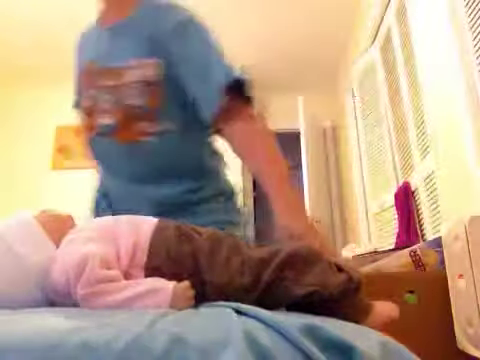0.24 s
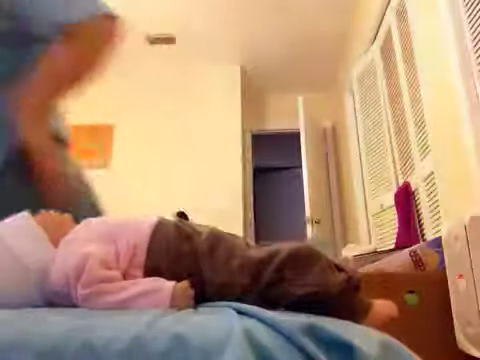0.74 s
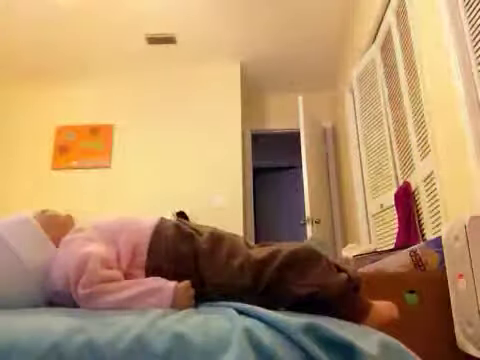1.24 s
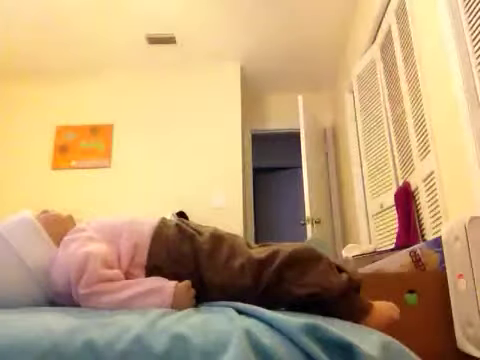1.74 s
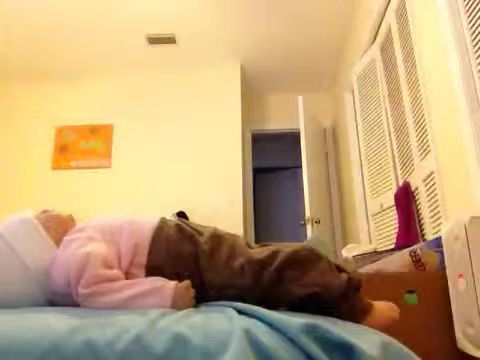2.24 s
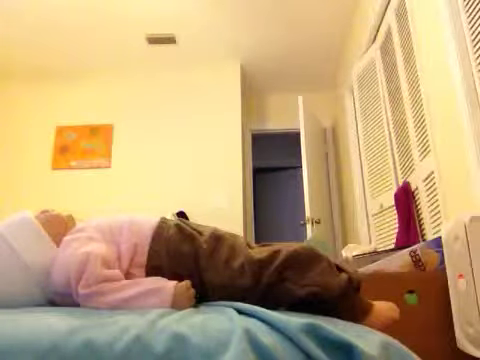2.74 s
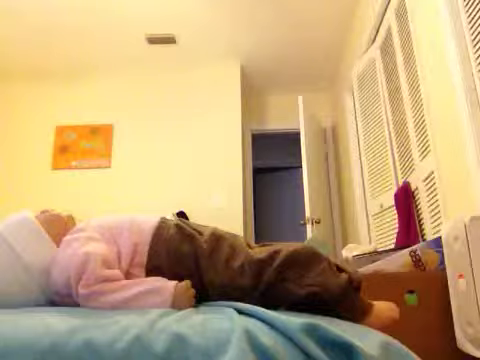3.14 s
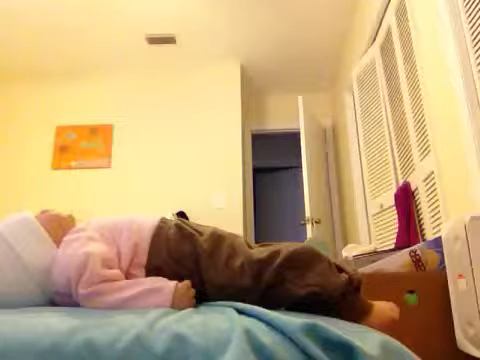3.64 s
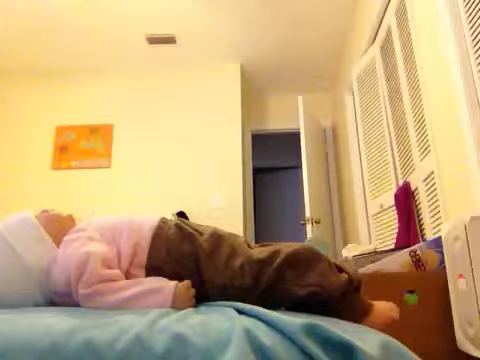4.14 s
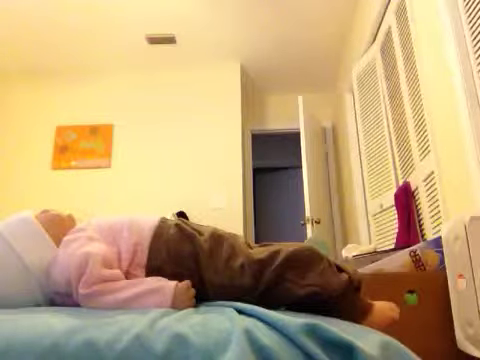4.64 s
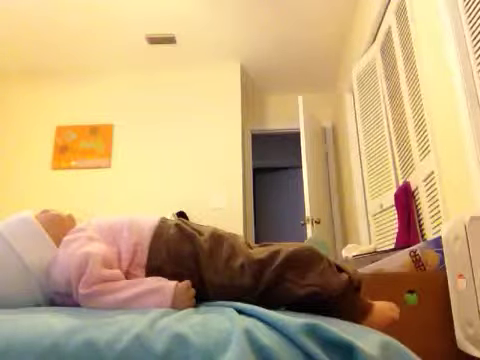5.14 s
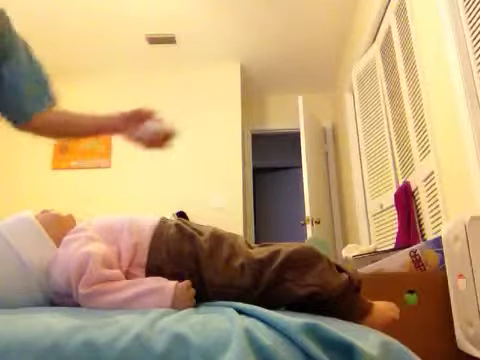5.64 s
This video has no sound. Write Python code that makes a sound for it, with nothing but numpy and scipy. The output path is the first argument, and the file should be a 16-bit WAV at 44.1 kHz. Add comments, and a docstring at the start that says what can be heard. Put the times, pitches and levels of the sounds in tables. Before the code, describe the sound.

Fixed room microphone, low steady hiss. Clothes swish and muffled footsteps thump on the floor, then a hard triple knock and a second pair break out, with short low scuffs between them. Softer thuds and rustling continue, a small cluster of knocks comes, then a dragging groan of the sole and the heaviest knock of all. The ending is nearly still, with faint cloth movement.

```python
"""Someone moves about a small, quiet bedroom, over faint steady room tone and hiss (coloured noise).
First, grainy cloth swishes (banded noise), sole rumble (low noise), soft booming footfalls and small clicks.
Then hard knocks in quick runs (thud, reflections, floor modes) and dragging soles (narrow-band noise).
Quieter steps and swishes follow; late drags lead to the loudest run of knocks, then only soft swishes."""
import sys
import numpy as np
from scipy import signal
from scipy.fft import rfft, irfft
from scipy.io import wavfile
from scipy.ndimage import uniform_filter1d

SR = 44100
rng = np.random.default_rng(int(sys.argv[2]) if len(sys.argv) > 2 else 0)


def pcm_store(signal):
    """Save signal as 16-bit PCM."""
    levels = np.round(np.clip(np.atleast_2d(signal), -1, 1) * 32767)
    wavfile.write(sys.argv[1], SR, levels.astype(np.int16).T)


N = 259730
RING_S = np.arange(SR // 2) / SR   # time since a contact

# steady room tone and hiss: freq_hz, density_db [relative, per Hz]
ROOM_TONE_SPECTRUM = [(20, -49), (50, -30), (85, -14.5), (115, 1.5), (145, -2), (250, -6.5), (480, -11),
                      (800, -13.5), (1300, -18.5), (3200, -18.5), (15000, -21.5)]
ROOM_TONE_DB = -66

# body movements: peak_s, rise_s, fall_s, swish_db, brightness_db, floor_rumble_db
MOVES = [(.23, 0.037, 0.028, -70, -10.5, -64), (.37, 0.095, 0.11, -62.5, 6, -62.5),
         (.57, 0.062, 0.25, -65, 10, -66.5), (.82, 0.13, 0.1, -64.5, 4.5, -61.5),
         (1.28, 0.11, .10, -61, 8.5, -63.5), (1.53, 0.15, 0.18, -68.5, 12, -59.5),
         (1.81, 0.022, 0.072, -57.5, -6, -59.5), (1.86, 0.075, 0.11, -56.5, 2.5, -55.5),
         (2.16, 0.047, 0.063, -49, -4, -44.5), (2.30, 0.24, 0.17, -57.5, 2, -60.5),
         (2.57, 0.088, 0.19, -57, -2, -62), (2.76, .06, 0.5, -76.5, -7, -58.5),
         (3.09, 0.08, 0.038, -75, 37, -84), (3.40, 0.19, 0.077, -87, -34, -66),
         (3.629, 0.073, 0.055, -65.5, 4, -70), (3.76, 0.1, 0.13, -62, 3, -59),
         (3.90, 0.13, 0.18, -57, 7, -53), (4.40, 0.089, 0.054, -49.5, 1.5, -49.5),
         (4.47, 0.08, 0.045, -55, -1, -48.5), (4.59, 0.042, 0.096, -50.5, 0.5, -46.5),
         (4.85, 0.06, 0.073, -67, 7, -69.5), (5.53, 0.14, 0.14, -62, 7, -67.5),
         (5.70, 0.056, 0.11, -64, 5, -66), (5.87, 0.055, 0.051, -65.5, 11, -71)]
# rubbing cloth: freq_hz, density_db [relative, per Hz]
CLOTH_SPECTRUM = [(250, -26), (450, -8.5), (650, -12), (850, -14), (1020, -12.5), (1300, -16.5),
                  (2100, -19.5), (3300, -23.5), (4300, -24.5), (5100, -24), (6000, -27.5), (8000, -35.5),
                  (15000, -37.5)]
# dragging sole and floor: freq_hz, density_db [relative, per Hz]
SOLE_SPECTRUM = [(53, -75), (90, -47), (142, -8.5), (257, -5.5), (286, -6), (382, -10), (450, -4),
                 (515, -19.5), (642, -32), (764, -16), (900, -26), (1170, -47.5), (1980, -120)]
SWELL_SHAPE = 1.64         # exponent: 1 = pointed, 2 = bell
RUMBLE_LAG_S = 0.01        # the floor answers after the clothes
SWISH_FLOOR_DB = -90.5     # tiny constant swish level, keeps the brightness division defined

# sole drags that make the floor drone: peak_s, half_length_s, level_db, pitch_hz
DRAGS = [(1.735, 0.034, -53, 288), (1.922, 0.036, -47, 271), (2.095, 0.013, -47.5, 203),
         (3.985, 0.016, -51, 280), (4.399, 0.018, -38.5, 432), (4.427, 0.04, -37.5, 298),
         (4.49, 0.051, -49, 418)]
# small clicks and creaks: start_s, level_db, centre_hz, upper_edge_over_centre [ratio], build_up_s
CLICKS = [(.505, -68.5, 7600, 1.9, 0.0026), (0.982, -56, 10900, 1.35, .003), (1.445, -55, 2300, 2.4, .0003),
          (1.456, -57, 3580, 2.8, 0.00044), (1.688, -57, 3240, 2.14, 0.00021),
          (1.7, -62.5, 6400, 2.4, 0.00017), (3.268, -61, 1840, 1.74, 0.0064)]

# colour of a blow in the reflections: freq_hz, density_db [relative, per Hz]
BLOW_SPECTRUM = [(50, -52), (90, -28.5), (130, -24), (180, 3.5), (300, 0), (480, -9), (800, -6.5),
                 (1800, -19.5), (2800, -26.5), (5000, -25), (6500, -31.5), (8000, -36), (15000, -44)]
# decay of the room: freq_hz, t60_s
ROOM_T60 = [(100, 0.41), (300, 0.1), (1000, 0.17), (5000, 0.23), (12000, 0.21)]
# floor and room modes: pitch_hz, strength_db [relative], t60_s
MODES = [(183.8, 9.5, 0.072), (225.5, 0.5, 0.088), (292, -1, 0.22), (345, -0.5, 0.25), (428, -1.5, 0.12),
         (514, -10.5, 0.12), (591.5, -8, 0.22), (741, 0, 0.08), (815, -7.5, 0.19), (1036, -5.5, 0.16),
         (1303, -9.5, 0.12), (1614, -15, 0.2), (1952, -17, .15), (2230, -12, 0.08), (2683, -20.5, 0.26)]
PUSH_DB, PUSH_LOW_HZ, PUSH_HIGH_HZ = -34.5, 49, 110   # push of air; dB re boom

# soft footfalls: start_s, boom_db, boom_hz
FOOTFALLS = [(0.498, -61, 167), (.632, -57, 265), (.721, -53, 173), (1.02, -60.5, 306), (1.208, -50, 258),
             (1.394, -55, 236), (2.188, -44, 240), (2.675, -47.5, 230), (3.036, -60, 241),
             (3.264, -54, 338), (3.694, -60, 283), (3.76, -52, 184), (4.056, -45, 315)]
SOFT_KNOCK_DB, SOFT_CRACK_DB, SOFT_HARDNESS_HZ = -25, -24, 645   # soft sole; dB re boom
# hard knocks: start_s, boom_db, boom_hz, knock_db, hardness_hz, crack_db
KNOCKS = [(1.5696, -35, 357, -42, 2280, -51.5), (1.580, -33.5, 300, -44, 2020, -59),
          (1.593, -40, 340, -44, 1600, -55.5), (1.794, -49.5, 289, -55.5, 990, -70),
          (2.144, -34, 410, -38.5, 1390, -56), (2.162, -33.5, 253, -54, 890, -52),
          (2.335, -50.5, 257, -58, 990, -76), (2.803, -47.5, 257, -53, 735, -71),
          (2.913, -46.5, 470, -54, 1870, -60), (2.947, -47, 443, -57.5, 1240, -67),
          (3.14, -48.5, 300, -53.5, 600, -72.5), (3.797, -47.5, 280, -53.5, 865, -80),
          (3.838, -54, 500, -40.5, 860, -52), (3.86, -43, 304, -55.5, 900, -58.5),
          (3.887, -50, 286, -52, 950, -77), (4.065, -41.5, 264, -50, 1140, -60),
          (4.586, -29.5, 330, -36, 1600, -42.5), (4.594, -22.5, 237, -35.5, 1500, -37.5),
          (4.602, -29.5, 290, -51, 776, -46)]

CUTOFF_HZ = 15350


def from_db(db):
    """Decibels to gain."""
    return 10 ** (np.asarray(db) / 20)


def at_hz(points, hz):
    """Read a table on a log-frequency axis."""
    points = np.array(points)
    return np.interp(np.log(np.maximum(hz, 1)), np.log(points[:, 0]), points[:, 1])


def band(x, low_hz, high_hz, order=2):
    """Causal Butterworth band-pass."""
    edges_hz = [low_hz, min(high_hz, SR / 2 - 1000)]
    return signal.sosfilt(signal.butter(order, edges_hz, "band", fs=SR, output="sos"), x)


def unit_hit(x):
    """Scale a hit to the total energy of 30 ms at rms 1."""
    return x / np.sqrt(np.sum(x ** 2) / (.03 * SR) + 1e-20)


def add(out, start_s, sound):
    """Mix a sound in at start_s."""
    start = max(round(start_s * SR), 0)
    out[start:start + len(sound)] += sound[:N - start]


def noise(spectrum):
    """Noise of a given colour, rms 1."""
    gain = from_db(at_hz(spectrum, np.fft.rfftfreq(N, 1 / SR)))
    x = irfft(rfft(rng.standard_normal(N)) * gain, N)
    return x / x.std()


def drift(points_per_s):
    """Random points joined by straight lines, spread just under 1."""
    return np.interp(np.arange(N) / SR * points_per_s, np.arange(4096), rng.standard_normal(4096))


def room_tone():
    """Steady coloured noise: the quiet room and hiss."""
    return from_db(ROOM_TONE_DB) * noise(ROOM_TONE_SPECTRUM)


def swell(peak_s, rise_s, fall_s):
    """Speed of one movement: it gathers to 1 at peak_s and dies away."""
    t = np.arange(N) / SR - peak_s
    distance = np.abs(t / np.where(t < 0, rise_s, fall_s))
    return np.exp(-np.minimum(distance, 8) ** SWELL_SHAPE)


def clothes(grain_db):
    """Folds rub dully and fibres hiss; both catch and slip, so the swish is grainy and its colour wanders."""
    power, bright = from_db(SWISH_FLOOR_DB) ** 2, 0
    for peak_s, rise_s, fall_s, swish_db, bright_db, _ in MOVES:
        share = (from_db(swish_db) * swell(peak_s, rise_s, fall_s)) ** 2
        power = power + share
        bright = bright + share * bright_db
    edges_hz = np.geomspace(300, 18000, 9)
    fibres, out = (noise(CLOTH_SPECTRUM), noise(CLOTH_SPECTRUM)), 0
    for k, (low_hz, high_hz) in enumerate(zip(edges_hz, edges_hz[1:])):
        octaves = np.log2(np.sqrt(low_hz * high_hz) / 2400)
        tilt_db = bright / power * np.tanh(octaves) / 2   # power-weighted brightness
        out = out + band(fibres[k % 2], low_hz, high_hz) * from_db(tilt_db + 1.85 * drift(35))
    return np.sqrt(power) * from_db(grain_db * drift(250)) * out


def scuffs(uneven_db):
    """With every movement the soles drag unevenly and make the floor rumble."""
    power = 0
    for peak_s, rise_s, fall_s, _, _, rumble_db in MOVES:
        power = power + (from_db(rumble_db) * swell(peak_s + RUMBLE_LAG_S, rise_s, fall_s)) ** 2
    return np.sqrt(power) * from_db(uneven_db * drift(48)) * noise(SOLE_SPECTRUM)


def drags(width):
    """Stick and slip wander round one pitch at an even strength, swelling and dying away."""
    out, t = np.zeros(N), np.arange(N) / SR
    for peak_s, half_length_s, level_db, pitch_hz in DRAGS:
        judder = band(rng.standard_normal(N), pitch_hz / (1 + width), pitch_hz * (1 + width))
        judder /= np.sqrt(uniform_filter1d(judder ** 2, size=SR // 100) + 1e-12)   # level over 10 ms
        out += from_db(level_db) * np.exp(-((t - peak_s) / half_length_s) ** 2) * judder
    return out


def clicks(room_db, room_t60_s, snap_s):
    """Tiny hard contacts: a bright, gritty snap and a faint wash from the walls."""
    out = np.zeros(N)
    for start_s, level_db, centre_hz, span, build_s in CLICKS:
        decay = np.exp(-RING_S / snap_s) + from_db(room_db - 60 * RING_S / room_t60_s)
        fade = decay * (1 - np.exp(-RING_S / build_s)) ** 2
        grit = rng.standard_normal(len(RING_S)) * from_db(8.8 * rng.standard_normal(len(RING_S))) * fade
        core = band(grit, centre_hz / max(span, 1.1), centre_hz * max(span, 1.1), order=3)
        skirt = band(grit, centre_hz * 0.36, centre_hz * 2 * span)
        add(out, start_s, from_db(level_db) * unit_hit(core + from_db(-5.0) * skirt))
    return out


def reflections(near_db, near_s):
    """A sharp first arrival, then dense wall reflections that die away band by band."""
    edges_hz = np.geomspace(40, 16000, 22)
    white, out = rng.standard_normal((2, len(RING_S))), 0
    for k, (low_hz, high_hz) in enumerate(zip(edges_hz, edges_hz[1:])):
        centre_hz = np.sqrt(low_hz * high_hz)
        late = from_db(-60 * RING_S / at_hz(ROOM_T60, centre_hz))
        near = from_db(near_db) * np.exp(-RING_S / near_s)
        gain = from_db(at_hz(BLOW_SPECTRUM, centre_hz)) * np.sqrt(high_hz - low_hz)
        out = out + gain * unit_hit(band(white[k % 2] * (late + near), low_hz, high_hz))
    return unit_hit(out)


def standing_waves(spread_db, build_s):
    """Each blow lands elsewhere and so feeds the decaying modes with strengths of its own."""
    pitch_hz, strength_db, t60_s = np.array(MODES).T[:, :, None]
    signs = (-1) ** np.arange(len(MODES))[:, None]
    strength = signs * from_db(strength_db + spread_db * rng.standard_normal(pitch_hz.shape))
    waves = strength * from_db(-60 * RING_S / t60_s) * np.sin(2 * np.pi * pitch_hz * RING_S)
    return unit_hit(waves.sum(axis=0) * (1 - np.exp(-RING_S / build_s)))


def first_arrival(thud_hz, ring_hz, thud_s, ring_s, ring_db):
    """Heard straight across the room: a short thud and the brief ring of the struck spot."""
    thud = unit_hit(RING_S * np.exp(-RING_S / thud_s) * np.sin(2 * np.pi * thud_hz * RING_S))
    ring = unit_hit(np.exp(-RING_S / ring_s) * np.sin(2 * np.pi * ring_hz * RING_S))
    return unit_hit(thud + from_db(ring_db) * ring)


def resonate(x, pitch_hz, width, lift_db):
    """Lift a resonance out of a sound; the width is a share of its pitch."""
    b, a = signal.iirpeak(pitch_hz, 1 / width, fs=SR)
    return x + from_db(lift_db) * signal.lfilter(b, a, x)


def blow(boom_db, boom_hz, knock_db, hardness_hz, crack_db):
    """Boom, knock and crack each have their own level; hardness sets how high the knock reaches."""
    room = reflections(near_db=-2.5, near_s=0.0039) + standing_waves(spread_db=2.0, build_s=0.0011)
    direct = first_arrival(boom_hz, 0.94 * hardness_hz, thud_s=0.0015, ring_s=0.001, ring_db=-4.5)
    # each struck spot favours a low pitch of its own
    boom = unit_hit(resonate(band(room, 170, 522, order=4), boom_hz, width=0.42, lift_db=8.5))
    boom = boom + from_db(-4.5) * unit_hit(band(direct, 187, 663, order=3))
    # a softer contact reaches less high
    knock = band(room + from_db(-2) * direct, 500, 4260, order=3)
    knock = band(knock, 150, max(1.27 * hardness_hz, 600), order=3)
    crack = band(room + from_db(-14.5) * direct, 1900, 13000, order=3)
    push = band(direct, PUSH_LOW_HZ, PUSH_HIGH_HZ)
    parts = (push, boom_db + PUSH_DB), (boom, boom_db), (knock, knock_db), (crack, crack_db)
    return sum(from_db(level_db) * unit_hit(part) for part, level_db in parts)


def footfalls():
    """Soft steps are nearly all boom."""
    out = np.zeros(N)
    for start_s, boom_db, boom_hz in FOOTFALLS:
        step = blow(boom_db, boom_hz, boom_db + SOFT_KNOCK_DB, SOFT_HARDNESS_HZ, boom_db + SOFT_CRACK_DB)
        add(out, start_s, step)
    return out


def knocks():
    """Hard contacts, the loudest in quick runs of two or three."""
    out = np.zeros(N)
    for start_s, *contact in KNOCKS:
        add(out, start_s, blow(*contact))
    return out


def scene():
    """Movement over the steady room tone."""
    background = room_tone()
    rubbing = clothes(grain_db=0.7) + scuffs(uneven_db=3.0) + drags(width=0.16)
    contacts = clicks(room_db=-11.5, room_t60_s=0.21, snap_s=0.0033) + footfalls() + knocks()
    return (background + rubbing + contacts)[None]


def record(dry):
    """The top is cut steeply by an elliptic low-pass."""
    return signal.sosfilt(signal.ellip(12, .1, 80, CUTOFF_HZ, fs=SR, output="sos"), dry)


dry = scene()
out = record(dry)
pcm_store(out)
```